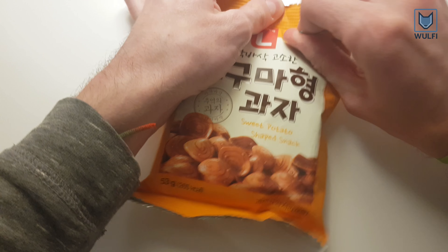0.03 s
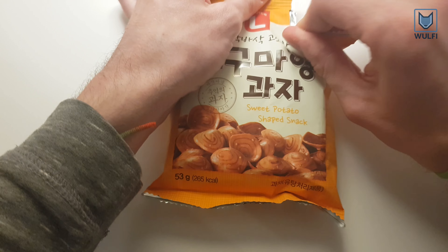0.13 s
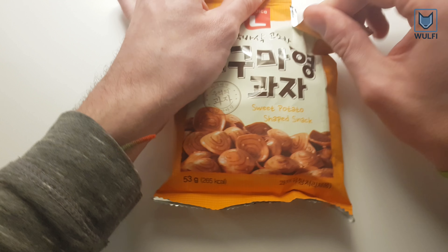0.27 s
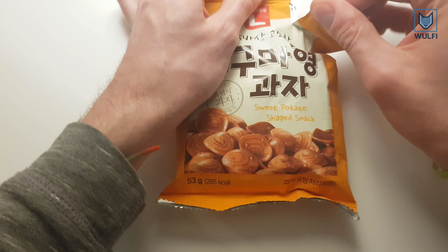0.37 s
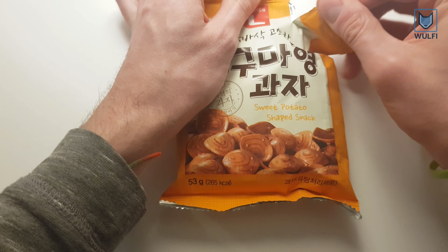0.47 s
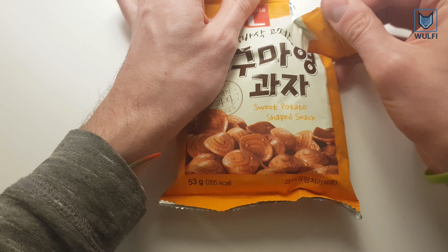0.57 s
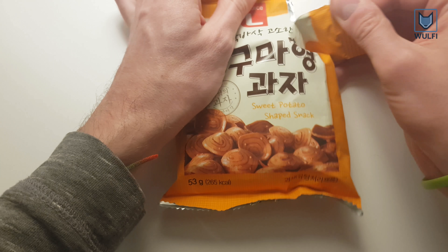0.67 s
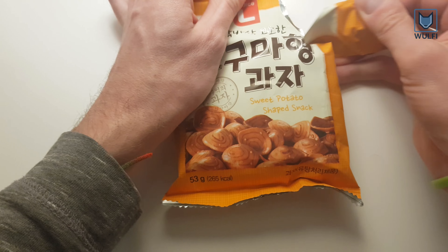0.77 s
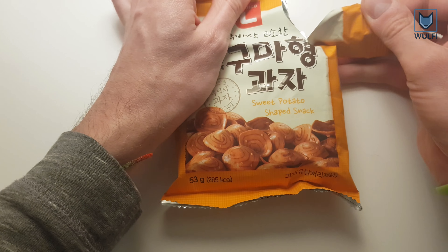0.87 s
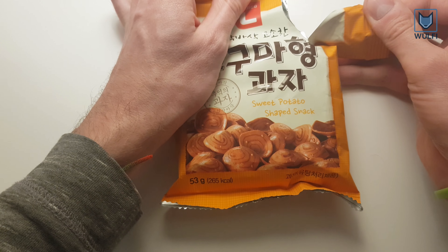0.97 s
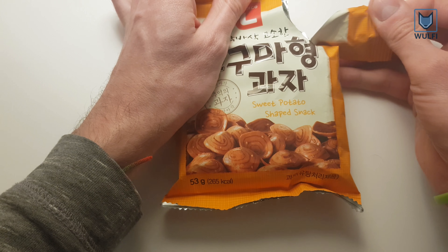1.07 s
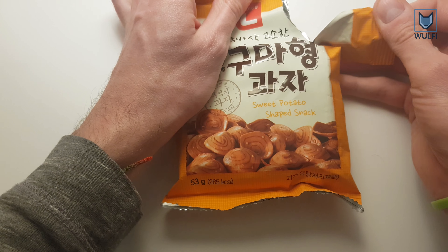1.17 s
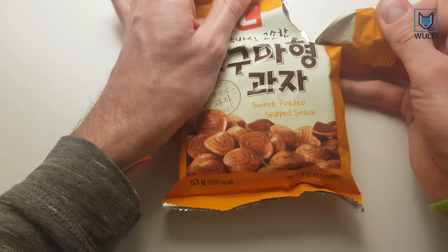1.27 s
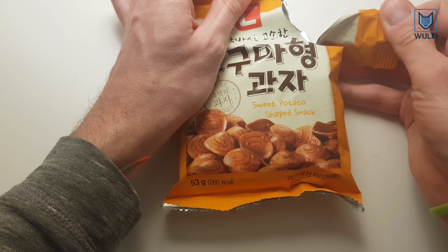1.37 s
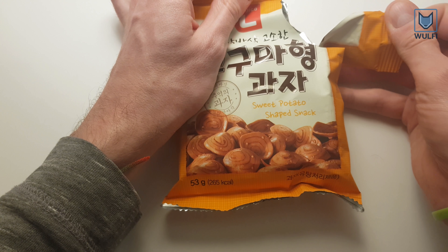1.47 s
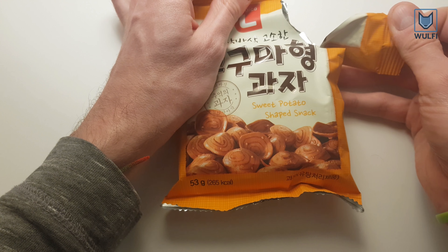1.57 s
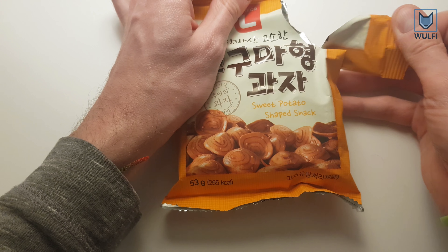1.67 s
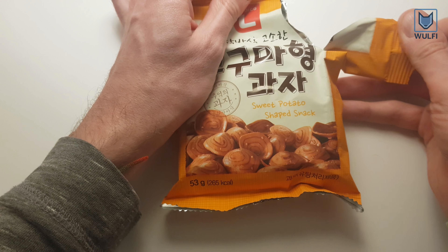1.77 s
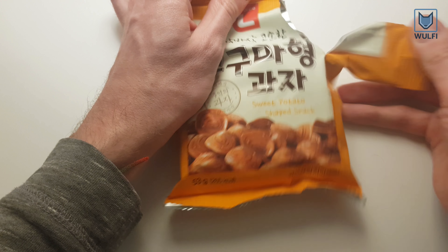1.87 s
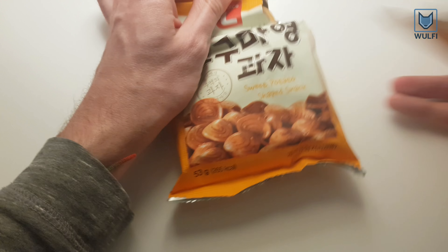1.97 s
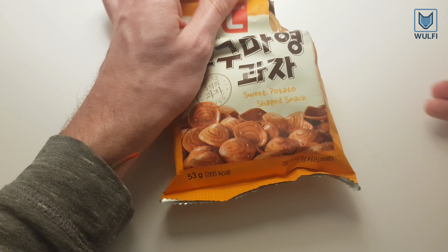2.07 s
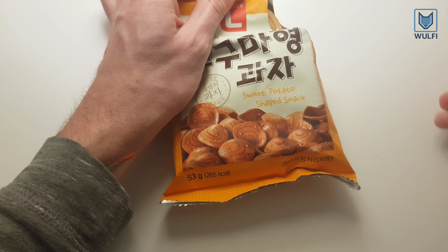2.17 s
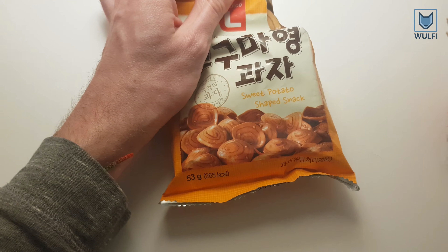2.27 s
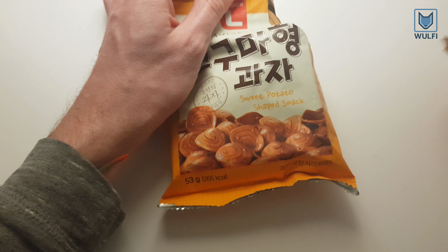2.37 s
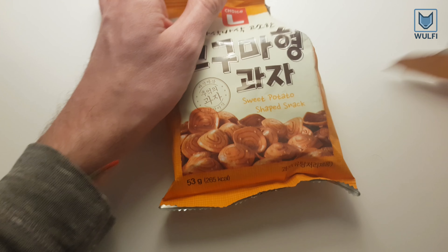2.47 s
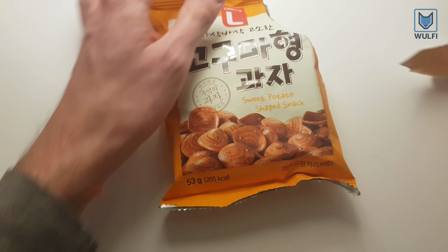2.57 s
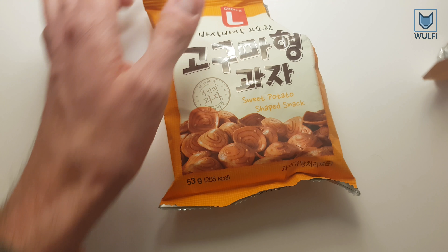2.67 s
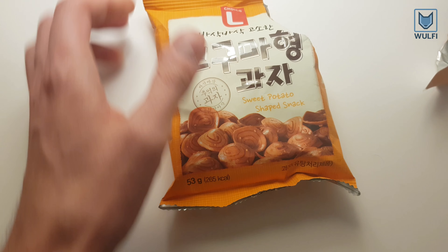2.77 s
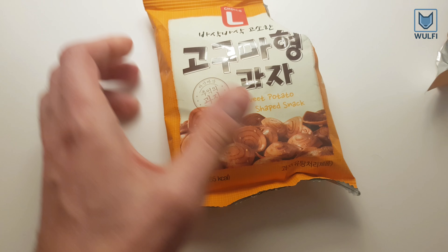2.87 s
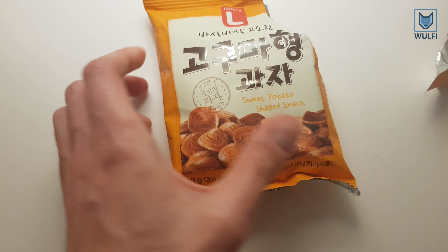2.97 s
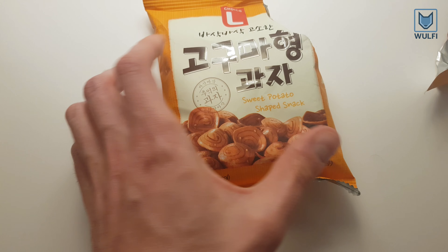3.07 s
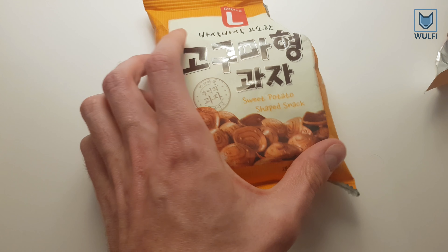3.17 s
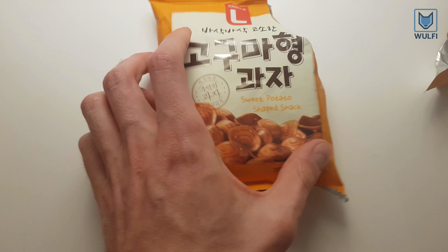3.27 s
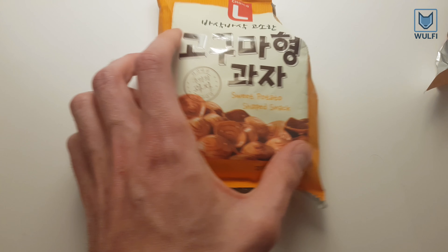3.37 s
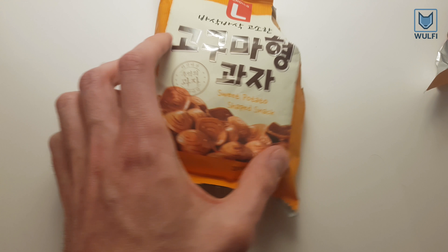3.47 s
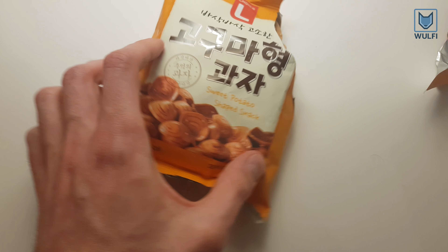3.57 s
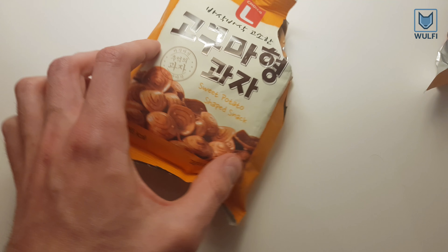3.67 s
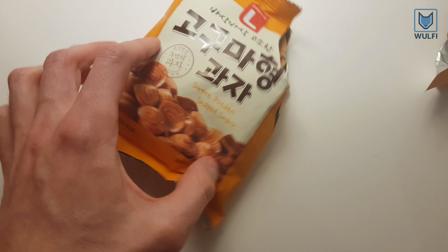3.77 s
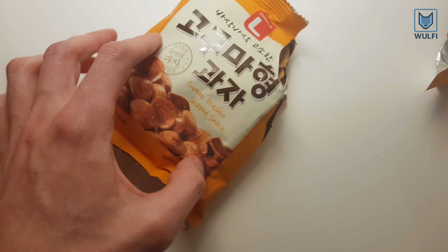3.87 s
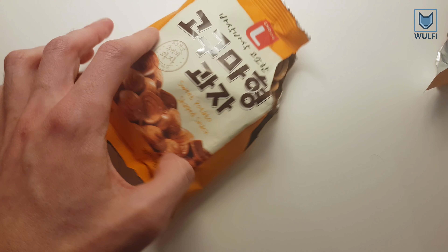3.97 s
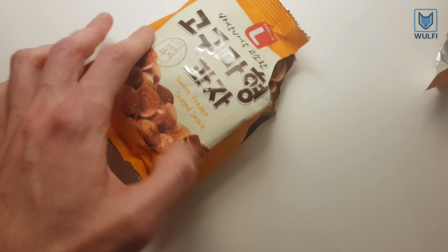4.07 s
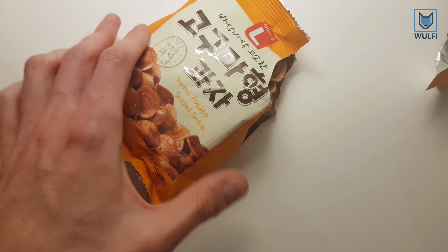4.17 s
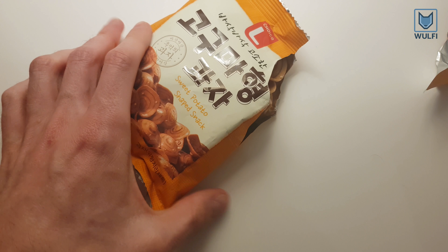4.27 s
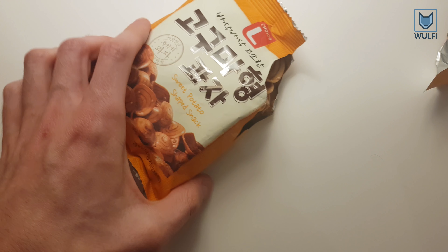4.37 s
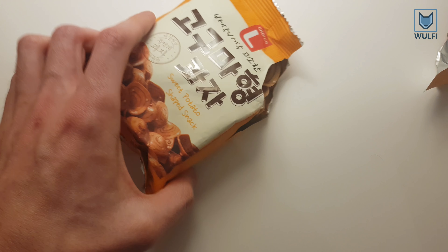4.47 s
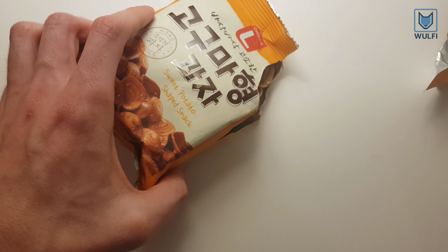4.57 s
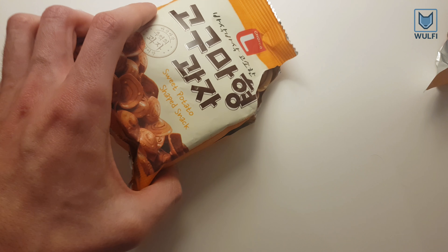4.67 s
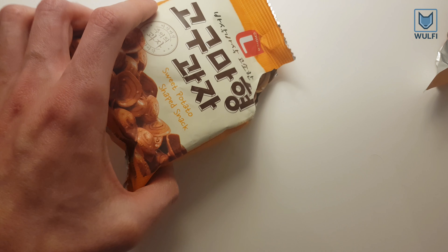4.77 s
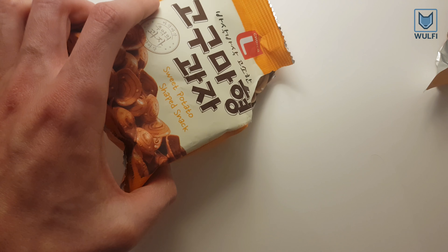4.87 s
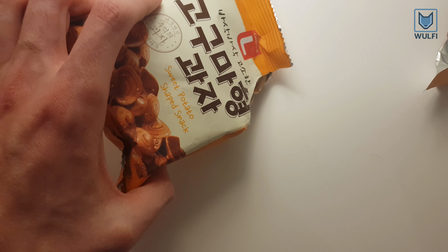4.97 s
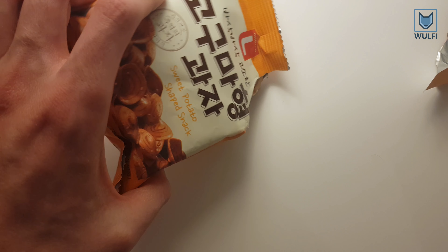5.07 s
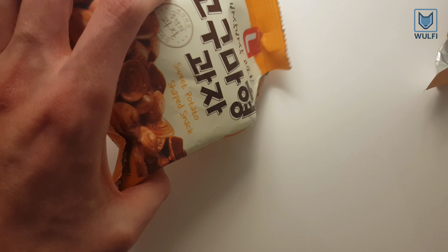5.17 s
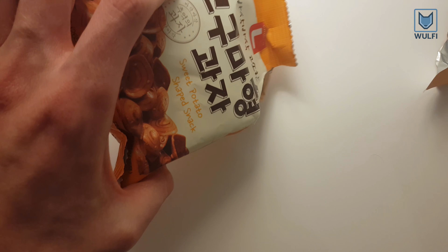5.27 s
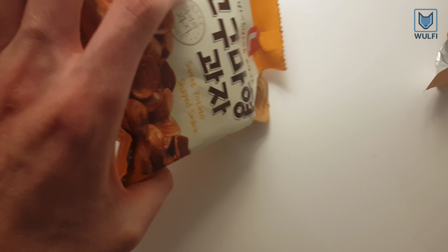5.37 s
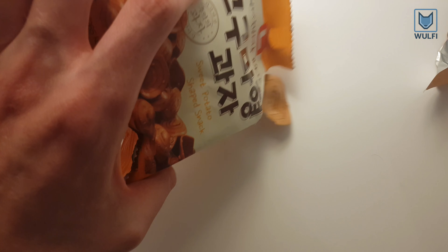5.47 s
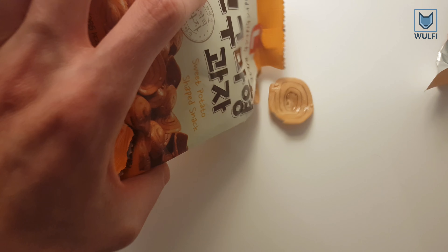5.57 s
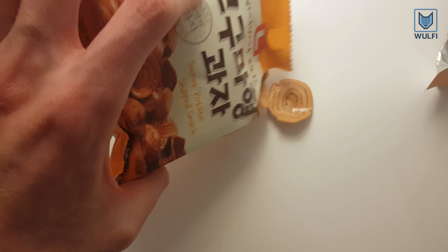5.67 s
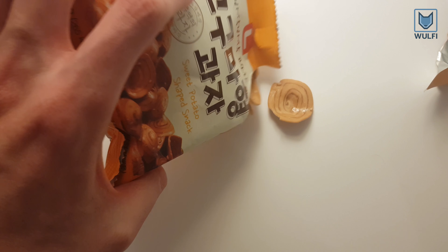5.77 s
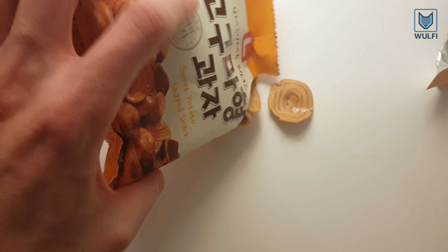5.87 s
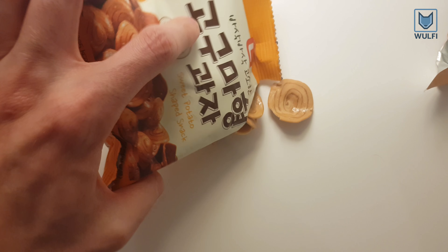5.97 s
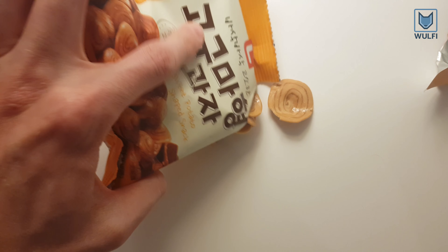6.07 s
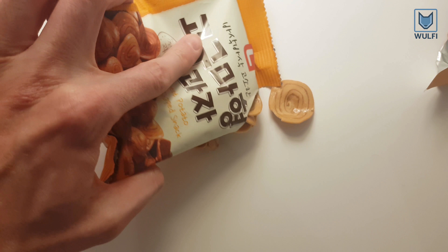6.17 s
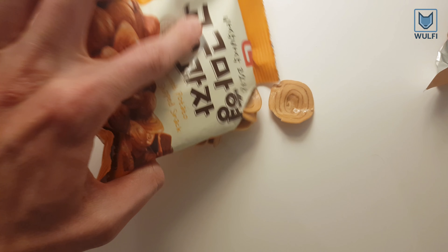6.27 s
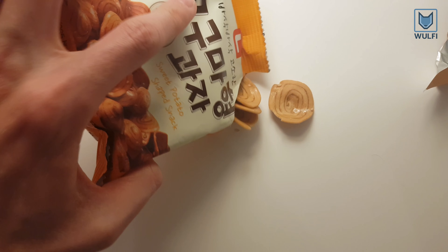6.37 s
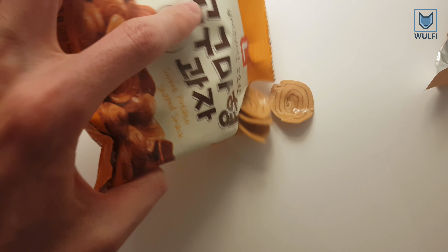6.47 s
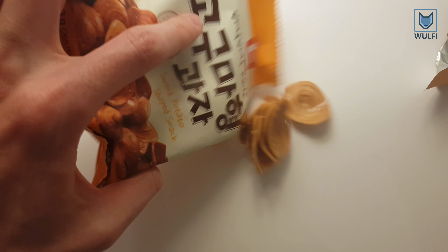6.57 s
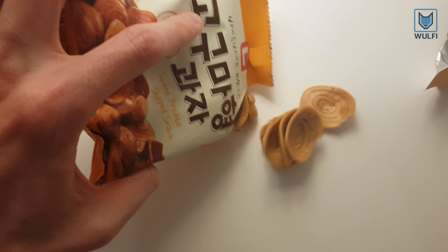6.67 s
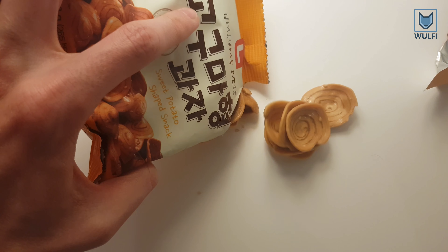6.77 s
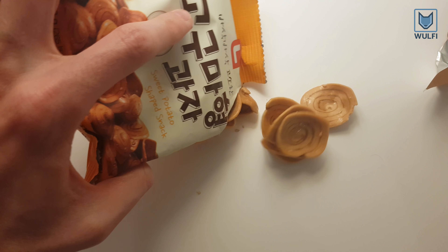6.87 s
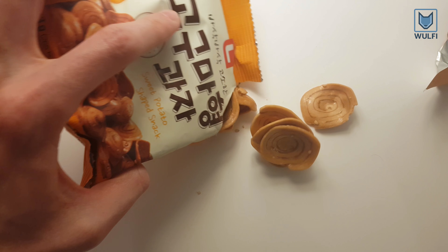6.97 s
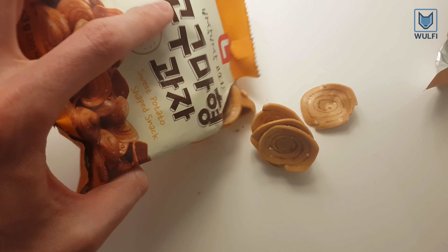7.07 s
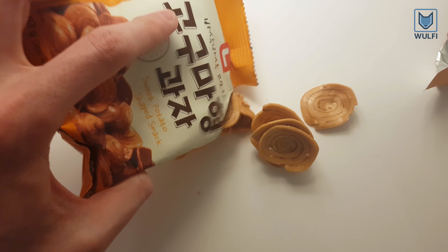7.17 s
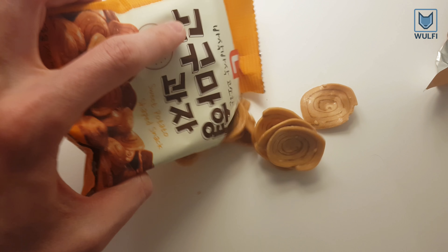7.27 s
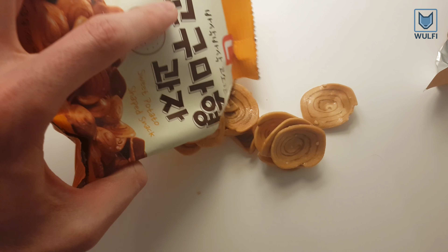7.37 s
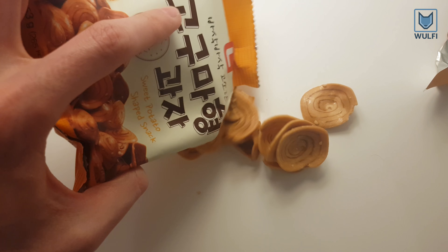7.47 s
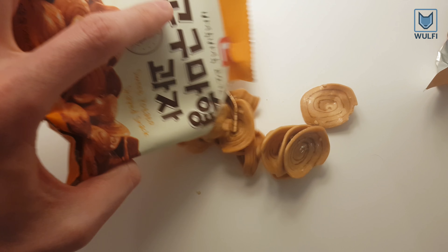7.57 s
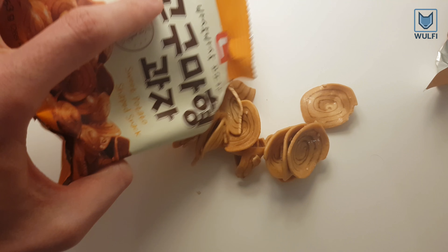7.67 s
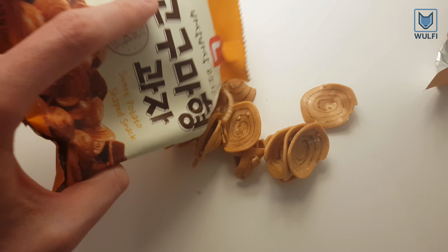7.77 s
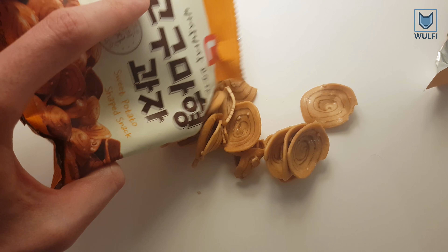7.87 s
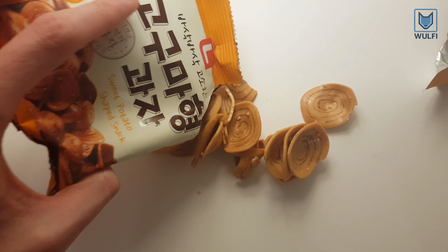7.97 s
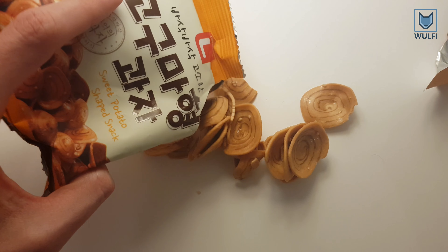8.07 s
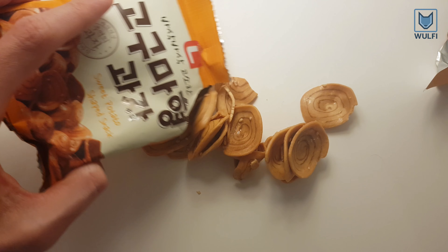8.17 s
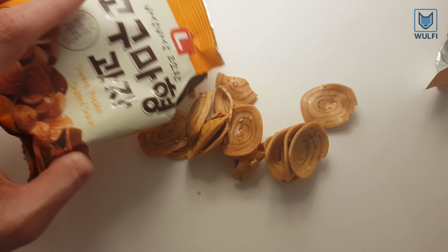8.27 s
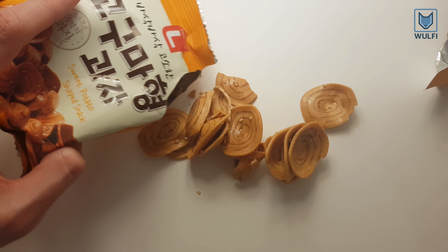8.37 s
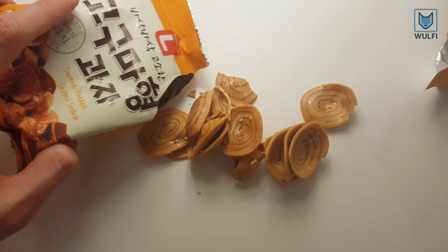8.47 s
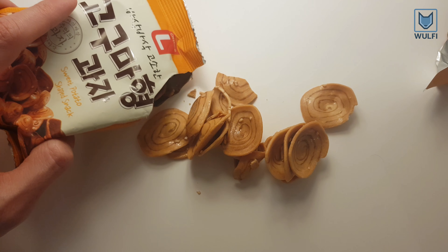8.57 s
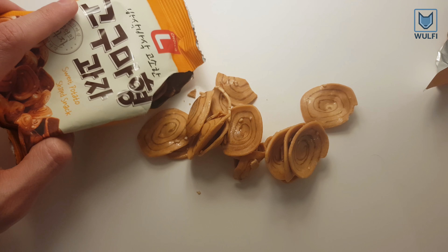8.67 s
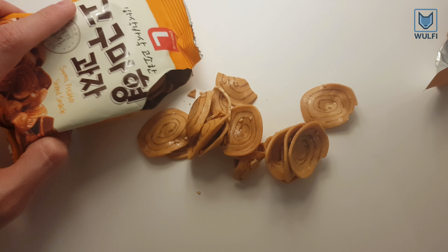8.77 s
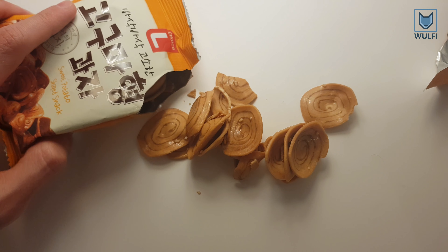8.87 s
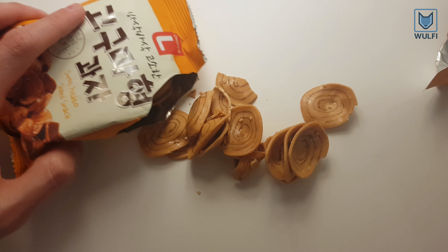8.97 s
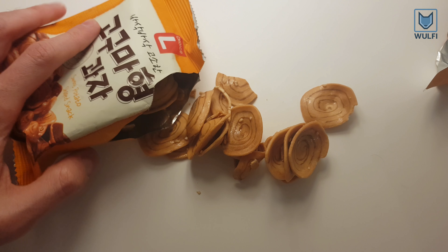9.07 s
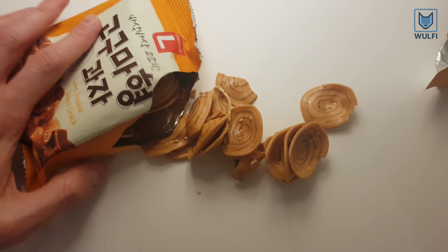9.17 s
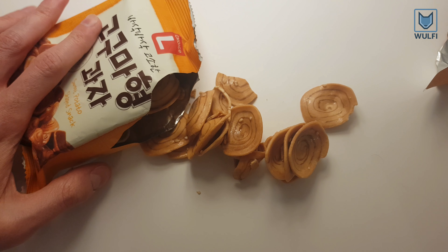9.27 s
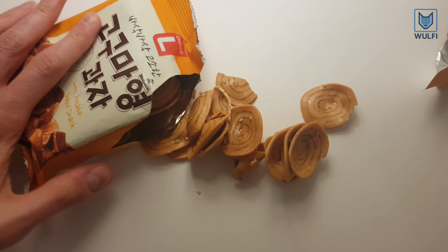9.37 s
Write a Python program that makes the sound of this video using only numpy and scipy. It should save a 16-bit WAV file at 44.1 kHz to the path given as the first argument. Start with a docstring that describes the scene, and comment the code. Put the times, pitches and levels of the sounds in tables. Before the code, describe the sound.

Very close stereo sound in a small bare room: a foil-lined bag crackles and snaps sharply as a corner is torn, with a loud burst at two seconds. After a near-quiet pause it rubs across the table, is gripped and tilted, then shaken so crisp snacks drop with dry woody knocks. Loud final crumples end it.

```python
"""Snack bag torn open and emptied on a table

In a small bare room, a stereo microphone close by hears a foil-lined bag torn at a corner, slid over a
table and shaken until crisp snacks tumble out. Creases snap as ringing noise bursts over a crackle of tiny
random ticks; hand work and sliding are shaped noise. Landing snacks excite decaying modes of the table top.
Decaying noise tails answer as the room, over a faint steady hush.
"""
import sys
import numpy as np
from scipy import signal
from scipy.fft import rfft, irfft, next_fast_len
from scipy.io import wavfile
from scipy.ndimage import uniform_filter1d, map_coordinates

SR = 44100
rng = np.random.default_rng(int(sys.argv[2]) if len(sys.argv) > 2 else 0)


def store_pcm(level_fs):
    """Save levels as 16-bit WAV."""
    pcm = np.round(np.clip(level_fs, -1, 1) * 32767).astype(np.int16)
    wavfile.write(sys.argv[1], SR, np.atleast_2d(pcm).T)


N = 415863  # samples, about 9.4 s


def amp(db):
    """Decibels to an amplitude factor."""
    return 10 ** (np.asarray(db) / 20)


def unit(x):
    """Each row at rms 1."""
    return x / np.sqrt(np.mean(x ** 2, axis=-1, keepdims=True) + 1e-20)


def along(points, hz):
    """Interpolate (Hz, value) points on a log frequency axis."""
    f, v = np.transpose(points)
    return np.interp(np.log(hz + 1), np.log(f + 1), v)


def filtered(x, response):
    """Multiply the spectrum of x by a response of frequency."""
    size = next_fast_len(N + SR // 4)
    spectrum = rfft(x, size) * response(np.fft.rfftfreq(size, 1 / SR))
    return irfft(spectrum, size)[..., :N]


def coloured(x, spectrum):
    """Filter x by a table of gains, then set it to rms 1."""
    return unit(filtered(x, lambda hz: amp(along(spectrum, hz))))


def band(x, lo_hz, hi_hz, order=2):
    """A causal band-pass."""
    edges = [lo_hz, min(hi_hz, SR / 2 - 1)]
    return signal.sosfilt(signal.butter(order, edges, 'band', fs=SR, output='sos'), x)


def pair(shape, apart):
    """Noise at the two microphone ports: a shared part plus a part of their own."""
    return rng.standard_normal(shape) + apart * rng.standard_normal((2, *shape))


def add(track, s, sound):
    """Lay a sound into the track at time s."""
    start = max(round(s * SR), 0)
    part = track[:, start:start + sound.shape[-1]]
    part += sound[:, :part.shape[-1]]


def ticks(per_second, spread_db, apart):
    """Random impulses under noise of either sign: many small, a few large."""
    size = amp(spread_db * np.minimum(rng.exponential(size=N), 3))
    return (rng.random(N) < per_second / SR) * size * pair((N,), apart)


def patchy(x, depth_db, width_bins, length_frames):
    """The film bends, so its resonances come and go: a smoothed random gain over time and frequency."""
    z = signal.stft(x, nperseg=512)[2]
    field = rng.standard_normal(z.shape[1:])
    field = uniform_filter1d(field, width_bins, 0)
    field = uniform_filter1d(field, length_frames, 1)
    z = z * amp(depth_db * field / field.std())
    return signal.istft(z, nperseg=512)[1][:, :N]


# Colour of the quiet room at the microphone. Each row: frequency in Hz, gain in dB.
HUSH_COLOUR = [(15, -51.5), (25, -18), (43, -4.5), (97, 4.5), (363, -17), (1840, -27.5), (2410, -19),
               (5000, -26), (6920, -36), (12500, -22.5), (14800, -21.5), (16000, -30.5)]


def room_hush(level_db=-66.5):
    """The quiet room: steady coloured noise, partly shared by the two ports."""
    return amp(level_db) * coloured(pair((N,), 1.0), HUSH_COLOUR)


SWELL_DB = 20  # gained over each rise time and lost over each fall time


def swell(t, start, end, rise, fall):
    """A gain that rises to 1 at start, holds until end and dies away, in straight lines of dB."""
    before = np.maximum(start - t, 0) / rise
    after = np.maximum(t - end, 0) / fall
    return amp(-SWELL_DB * (before + after))


HOLD_ATTACK_S, HOLD_RELEASE_S = 0.022, 0.082
HELD_SNACKS_DB = -3.5  # snacks stirring in a lightly held bag, against the film
# Light handling of the bag between swells. Each row: start in seconds, end in seconds,
# film level in dB before the layer trims.
HOLDS = [(0, 0.937, -50.5), (0.953, 1.9, -68.5), (1.895, 2.744, -58), (3.84, 4.945, -57.5),
         (4.95, 5.299, -65), (5.39, 6.92, -57), (6.912, 8.376, -54.5), (8.407, 8.8, -61.5),
         (8.798, 9.43, -55)]
# Swells of crackle and stirring as the bag is worked; the faint ones near 1.24 and 1.47 s are bright tails
# of snaps. Each row: peak in seconds, rise in seconds, fall in seconds,
# film level in dB, snack level in dB (both before the layer trims).
SWELLS = [(.01, 0.042, 0.081, -43, -48), (.16, .012, 0.056, -24, -41), (.195, .04, 0.053, -25.5, -40),
          (.36, .03, 0.056, -43.5, -58), (.555, .03, 0.099, -48.5, -63), (.75, 0.042, 0.25, -40, -61),
          (.905, 0.086, 0.025, -32, -60), (1.24, .06, .12, -67.5, -69), (1.47, .03, .2, -57, -56),
          (1.77, 0.037, .13, -45.5, -42), (1.985, 0.029, 0.089, -19, -32), (2.069, .05, 0.028, -21, -30),
          (2.43, 0.0255, 0.15, -42, -63), (2.548, 0.099, 0.1, -33.5, -35), (3.863, 0.03, 0.18, -38, -42),
          (4.026, 0.023, 0.14, -42, -44), (4.15, 0.091, 0.14, -40, -41), (4.39, 0.026, 0.29, -46.5, -53),
          (4.58, .065, 0.054, -27.5, -38), (5.15, 0.047, 0.27, -44, -49), (5.45, 0.106, 0.095, -40.5, -45),
          (5.525, 0.044, 0.14, -38, -50), (5.68, 0.14, 0.2, -37, -43), (5.839, .04, 0.04, -44, -44),
          (5.986, .02, 0.11, -37.5, -46), (6.11, .1, .1, -40, -42), (6.215, 0.032, 0.22, -35.5, -39),
          (6.41, 0.076, 0.21, -31.5, -36), (6.616, 0.054, .07, -28, -44), (6.719, 0.12, 0.16, -27, -35),
          (7.09, .08, 0.2003, -47, -50), (7.274, 0.02, 0.25, -35.5, -39),
          (7.389, 0.063, 0.14, -28.5, -34.5), (7.74, 0.42, 0.32, -36, -38.5), (8.1, 0.26, 0.28, -41, -41.5),
          (8.35, 0.16, 0.044, -40.5, -50), (8.455, .04, 0.061, -46, -51), (8.949, 0.12, .13, -45, -41),
          (9.18, 0.083, 0.067, -28, -30), (9.283, .015, 0.096, -27, -38)]


def handling():
    """How strongly the film crackles and the snacks stir: powers add up into two gains per sample."""
    t = np.arange(0, N / SR, .001)
    film = 0
    for start, end, db in HOLDS:
        film = film + (amp(db) * swell(t, start, end, HOLD_ATTACK_S, HOLD_RELEASE_S)) ** 2
    stir = film * amp(HELD_SNACKS_DB) ** 2
    for s, rise, fall, film_db, snacks_db in SWELLS:
        power = swell(t, s, s, rise, fall) ** 2
        film = film + amp(film_db) ** 2 * power
        stir = stir + amp(snacks_db) ** 2 * power
    return [np.interp(np.arange(N) / SR, t, np.sqrt(power)) for power in (film, stir)]


# Snacks running out of the bag onto the table. Each row: time in seconds, flow from 0 to 1.
POUR = [(5.2, 0.39), (5.5, 1), (8.3, 1), (8.5, 0.1)]


def pouring():
    """The flow of snacks out of the bag at every sample; the first and last values hold outside the table."""
    return np.interp(np.arange(N) / SR, *np.transpose(POUR))


FIZZ_DB, FIZZ_GROWS = -12.5, 0.95  # fizz in dB before its trim = FIZZ_DB + FIZZ_GROWS x film level in dB
# Colour of the crackling film, close up. Each row: frequency in Hz, gain in dB.
FILM_COLOUR = [(400, -5), (620, -2), (820, 10.5), (1100, 0), (1450, 6), (2300, 5.5), (3400, 4), (5000, 8),
               (7600, -1), (9500, 1), (12500, -4.5), (15500, -9.5)]


def crackle(film, crackle_db=0.5, fizz_db=9.0, split_hz=5000, wrinkle_t60=0.023):
    """Countless tiny wrinkles give way while the film is worked; sliding snacks add a finer grain."""
    fizz = amp(FIZZ_DB) * film ** FIZZ_GROWS
    fine = .5 * pouring()
    coarse_energy = unit(ticks(750, 3.8, .3)) ** 2
    fine_energy = unit(ticks(2500, 3., .5)) ** 2
    energy = (1 - fine) * coarse_energy + fine * fine_energy
    # every wrinkle is a burst of a few milliseconds
    t = np.arange(SR // 100) / SR
    flutter = amp(-60 * t / wrinkle_t60)
    power = signal.fftconvolve(energy, flutter[None] ** 2, axes=1)[:, :N]
    grains = np.sqrt(np.abs(power)) * pair((N,), 1.7)
    grains = coloured(patchy(grains, 1.8, 7, 2), FILM_COLOUR)
    low = unit(band(band(grains, 650, 13000), 200, split_hz, order=1))
    high = unit(band(band(grains, split_hz, 18000, order=1), 2600, 23000))
    return amp(crackle_db) * film * low + amp(fizz_db) * fizz * high


def crisp_ticks(film, tick_db=-5.5, per_second=260, spread_db=3.5, low_hz=1000, high_hz=7000, cycles=0.7, count=2600):
    """Snacks and stiff wrinkles touch: dry clicks, each a brief decaying sine of its own pitch."""
    chance, t = rng.random((count, 2)), np.arange(SR // 150) / SR
    times = (np.arange(count) + 3 * chance[:, 0]) / per_second
    hz = (low_hz * (high_hz / low_hz) ** chance[:, 1])[:, None]
    size = amp(spread_db * np.minimum(rng.exponential(size=(count, 1)), 3))
    # the higher the click, the more its phase differs between the ports
    phase = 2 * np.pi * hz * t + hz / 3500 * rng.standard_normal((2, count, 1))
    clicks = size * unit(np.sin(phase) * np.exp(-hz * t / cycles))
    out = np.zeros((2, N))
    for k, s in enumerate(times):
        add(out, s, clicks[:, k])
    return amp(tick_db) * film * unit(band(out, 490, 14000))


# Colour of snacks heard through the pouch. Each row: frequency in Hz, gain in dB.
POUCH_COLOUR = [(40, -37.5), (70, -18.5), (110, -9), (160, 3.5), (240, 3), (330, -11.5), (420, 0.5),
                (490, 3), (600, -11), (820, -6.5), (1100, -27), (2000, -50)]


def jostle(stir):
    """Snacks jostle in the pouch: random ticks coloured by the pouch, following the stirring."""
    return stir * coloured(ticks(260, 5.3, 0.36), POUCH_COLOUR)


SMALL_PER_S, SMALL_SPREAD_DB, SMALL_PAN_DB = 32, 5, 5.5
SMALL_RING_DB, SMALL_CRACK_DB, SMALL_THUD_DB = 4.5, -5.5, 4  # over the film level, before the snap trims
SMALL_LOW_HZ, SMALL_HIGH_HZ = 780, 3600
SMALL_FOLLOWS = 0.29  # share of a swell's extra dB that small creases gain


def small_snaps(film, count=305):
    """Small creases flip by chance in each hold, stronger in a swell: rows like those of SNAPS."""
    chance, scatter = rng.random((count, 2)), rng.standard_normal((count, 4))
    s = (np.arange(count) + chance[:, 0]) / SMALL_PER_S
    pitch = SMALL_LOW_HZ * (SMALL_HIGH_HZ / SMALL_LOW_HZ) ** chance[:, 1]
    film_db = 20 * np.log10(film[np.minimum(s * SR, N - 1).astype(int)])
    offsets = SMALL_SPREAD_DB * scatter[:, :3] + [SMALL_RING_DB, SMALL_CRACK_DB, SMALL_THUD_DB]
    ring, crack, thud = offsets.T
    pan = SMALL_PAN_DB * scatter[:, 3]
    rows = []
    for start, end, hold_db in HOLDS:
        for k in np.flatnonzero((s >= start) & (s < end)):
            db = hold_db + SMALL_FOLLOWS * (film_db[k] - hold_db)
            rows.append((s[k], db + ring[k], pitch[k], db + crack[k], db + thud[k], pan[k]))
    return rows


# Where the bag lies before the microphone. Each row: time in seconds,
# lead in ms by which its sound reaches the left port first.
LEFT_LEAD = [(0, 0), (2, 0.00078), (4, 0.097), (8.2, 0.11), (8.6, 0.24), (9.4, 0.21)]
# Single creases buckling, loud and faint. Each row: start in seconds, ring level in dB, facet pitch in Hz,
# crack level in dB, thud level in dB (levels before the trims), left over right in dB.
SNAPS = [(.0186, -33, 1520, -62.5, -48, 4.5), (.0632, -20, 2730, -28.5, -36, -1),
         (.0712, -32, 2300, -48, -52, 0), (.0897, -36.5, 2970, -45, -54, -1.5),
         (.0978, -19, 2820, -20, -37, -1), (.1082, -32.5, 959, -42.5, -42, -1.5),
         (.1141, -17, 2620, -25, -41, 0.5), (.1544, -19.5, 3370, -19, -29, 0),
         (.1605, -21, 1488, -35.5, -38, -2.5), (.1692, -17.5, 3470, -24.5, -25.5, 3),
         (.1868, -24.5, 3400, -21.5, -40, -0.5), (.1954, -29, 5100, -21.5, -42, -2.5),
         (.2089, -27, 3430, -33.5, -32, 0.5), (.2152, -27.5, 2130, -24, -38, 1),
         (.2215, -29, 2700, -36, -46, 1.5), (.2409, -27, 7600, -25, -55, -5),
         (.2555, -33.5, 1600, -52.5, -54, -0.5), (.2652, -30, 3600, -41.5, -57, 15),
         (.2866, -27.5, 3650, -45, -33.5, -0.5), (.3372, -29, 1970, -47, -47, 3),
         (.346, -31, 3500, -30.5, -50, -2), (.3658, -24.5, 1300, -29.5, -48, 1.5),
         (.3879, -38.5, 1460, -46, -57, 1), (.4598, -33.5, 930, -58, -38, 0),
         (.4871, -26.5, 1880, -33.5, -62, 3), (.4959, -36, 4460, -30, -59, -4.5),
         (.5415, -18, 3580, -20.5, -30.5, -0.5), (.567, -28, 990, -33, -48, -2),
         (.6063, -29, 2880, -29.5, -53, 1), (.6396, -29.5, 1400, -45, -35, 1),
         (.6516, -33, 1340, -41, -32, 0.5), (.671, -38.5, 1380, -55, -42, 1),
         (.6975, -28, 1760, -40.5, -31, -0.5), (.717, -25, 3300, -24, -43, -1.5),
         (.7265, -11, 1490, -22.5, -45, 2), (.7365, -33, 1388, -34, -42, -0.5),
         (.7684, -38.5, 3230, -28.5, -47, -5), (.7826, -24, 1340, -28, -29.5, -1),
         (.81, -30, 860, -34.5, -38, 1.5), (.8362, -27.5, 1340, -42, -30.5, -0.5),
         (.8443, -34.5, 3360, -50, -43, 1.5), (.8507, -32, 3470, -30, -46, -4),
         (.8589, -31, 3500, -38, -32, 1.5), (.885, -23.5, 4700, -25.5, -44, 3.5),
         (.8893, -27, 4170, -18, -55, 2), (.8975, -24, 4630, -18, -45, -4.5),
         (.9175, -30.5, 5530, -23, -55, 2.5), (.9762, -40, 2208, -43.5, -69, 0.5),
         (.9873, -33.5, 3300, -30, -41, 0.5), (1.026, -32, 1590, -42, -41.5, 0.5),
         (1.094, -33, 3700, -48, -69, -1.5), (1.1386, -46, 865, -70, -46, -1),
         (1.1756, -38, 2809, -41, -67, 3.5), (1.1888, -24.5, 3800, -33.5, -60, -0.5),
         (1.2254, -26, 4760, -26.5, -60, 2), (1.239, -37, 2970, -43, -69, -1),
         (1.2597, -21, 1770, -23.5, -47, 0), (1.2944, -35, 1450, -31, -39.5, -0.5),
         (1.4129, -39, 1599, -59.5, -72, 1), (1.4408, -30.5, 1890, -48, -53, -1),
         (1.4469, -22.5, 1890, -20, -44, -0.5), (1.4593, -22, 3150, -20, -58, -1),
         (1.5027, -33, 894, -41.5, -52, -0.5), (1.5112, -31.5, 885, -41, -45, 2),
         (1.5491, -32.5, 1980, -40.5, -50, 1.5), (1.5717, -42.5, 3570, -44, -55, 0.5),
         (1.5856, -31.5, 4453, -37.5, -42, -1), (1.6019, -31, 3600, -40.5, -35, -0.5),
         (1.6694, -31, 979, -62, -34, -3), (1.682, -22.5, 5560, -22.5, -49, 1),
         (1.7065, -34.5, 1380, -41.5, -51, 0.5), (1.716, -24.5, 3740, -30.5, -33, -0.5),
         (1.7581, -20.5, 3020, -21.5, -33, 3), (1.7684, -23.5, 1150, -22.5, -26.5, -1.5),
         (1.8255, -24, 2740, -30, -29, 0.5), (1.8439, -37.5, 1620, -50, -45, 0.5),
         (1.9123, -36.5, 1420, -38.5, -43, 1), (1.9492, -20, 2040, -30.5, -27, 1),
         (1.9719, -16.5, 3427, -18.5, -24, 0.5), (1.9878, -21, 1930, -18, -26, -2.5),
         (2.0004, -31.5, 3810, -24.5, -27, -4), (2.018, -17.5, 920, -23, -19.5, -1),
         (2.0449, -20.5, 3400, -26, -42, 7.5), (2.0562, -15, 1900, -18, -22.5, -1.5),
         (2.0622, -21, 1650, -24.5, -32, 1), (2.0777, -15.5, 4220, -16.5, -32, -2.5),
         (2.0877, -26, 1420, -33, -21.5, 4), (2.1946, -32, 3893, -46, -43, -2),
         (2.2014, -37.5, 2020, -40.5, -44, 1.5), (2.3092, -36.5, 1730, -53.5, -37.5, 0.5),
         (2.3488, -40.5, 1410, -67, -51, -1), (2.3846, -36.5, 1440, -43.5, -68, -0.5),
         (2.4026, -31.5, 3040, -47, -38, -2), (2.4189, -26.5, 3010, -33, -64, 2),
         (2.4327, -27.5, 1980, -23, -64, -0.5), (2.4591, -34, 3530, -41.5, -55, 1),
         (2.4949, -25, 3470, -38, -59, 1.5), (2.504, -29, 1360, -30.5, -35.5, 1.5),
         (2.5274, -23, 3460, -24, -31, 1), (2.5334, -24.5, 940, -29, -28.5, -0.5),
         (2.5868, -22.5, 1360, -26.5, -31.5, 2.5), (2.6041, -31.5, 900, -46, -55, -4.5),
         (3.3915, -37, 2145, -71, -44, -3), (3.5697, -34, 1650, -59, -71, 0),
         (3.858, -23.5, 3550, -27.5, -57, 2.5), (3.876, -26.5, 1050, -44.5, -37, 2.5),
         (3.887, -31, 900, -39, -35, 3.5), (3.9112, -20.5, 2107, -31.5, -44, 0.5),
         (3.947, -31, 1830, -58, -58, 1), (3.9615, -29, 915, -54.5, -38, 0),
         (4.0149, -25.5, 3400, -34.5, -30.5, 2), (4.1342, -26, 1960, -46, -26.5, 0.5),
         (4.138, -25, 1923, -34.5, -29, -2), (4.1602, -20, 2280, -26, -25, 3.5),
         (4.1936, -25.5, 1180, -41.5, -37, 3), (4.3813, -27.5, 1950, -63, -26.5, -1),
         (4.4242, -29.5, 2103, -39, -36.5, 3), (4.467, -25, 1006, -47, -31, -1),
         (4.5072, -29, 1880, -30, -53, 1.5), (4.5322, -17.5, 850, -41, -31, -0.5),
         (4.5518, -25.5, 4100, -29, -60, -1.5), (4.5662, -20.5, 3580, -18, -28.5, 5),
         (4.5859, -17.5, 2330, -22.5, -51, 3), (4.6021, -17.5, 3670, -20.5, -31, 3),
         (4.621, -24, 4600, -25.5, -56, -3), (4.6416, -26, 1050, -36, -31.5, -1),
         (4.7237, -24.5, 4490, -38, -40, 1), (4.7745, -25.5, 3720, -31.5, -34.5, 0),
         (4.7846, -33, 1030, -56, -53, 7), (4.8143, -37, 960, -61, -35.5, -1),
         (4.845, -28.5, 4740, -43, -39, 2), (4.9271, -38.5, 805, -63, -40, 1),
         (5.1365, -26.5, 3940, -29, -28.5, -6), (5.1436, -22.5, 2960, -21.5, -51, 5.5),
         (5.1784, -29.5, 1010, -44, -33, 5), (5.3987, -37, 817, -54, -40, 2),
         (5.435, -29, 2620, -56, -34, -1), (5.4451, -26, 3320, -58, -30, 0.5),
         (5.4637, -32, 4560, -41.5, -43, 1), (5.5389, -31.5, 4456, -49.5, -36, -6),
         (5.5575, -34, 850, -52, -38, 2), (5.6549, -30, 856, -38.5, -34, 2.5),
         (5.6941, -50, 755, -27.5, -45, 6), (5.712, -33, 1910, -55, -48, 0),
         (5.7488, -51, 850, -44, -46, -1), (5.7663, -34.5, 816, -41, -45, 0),
         (5.8231, -46, 2560, -36.5, -49, -2), (5.8359, -31.5, 802, -33, -32, 0),
         (5.9845, -40, 846, -31.5, -24.5, 3), (5.9938, -49, 899, -31, -44, 4.5),
         (6.002, -35, 2400, -48, -44, 0), (6.0811, -37.5, 824, -52, -36, 4),
         (6.1191, -45, 3660, -39.5, -37, -4), (6.136, -30, 3030, -47, -38, 0),
         (6.1414, -24.5, 3020, -47, -33, 0.5), (6.1834, -36, 900, -56, -45, 2),
         (6.2003, -36, 3900, -31, -45, 3.5), (6.208, -21, 843, -23, -27, 1),
         (6.2603, -30, 1490, -41, -31, 2), (6.2817, -27, 1770, -36, -30.5, 2),
         (6.3487, -34.5, 2460, -30.5, -32, 1), (6.3564, -34, 1960, -37, -44, 0.5),
         (6.3752, -24, 3600, -28, -47, 0.5), (6.395, -23, 846, -49.5, -31, 0),
         (6.4215, -21.5, 3114, -26, -29.5, 7.5), (6.4276, -27, 2630, -16, -40, -3),
         (6.4533, -19.5, 4200, -28.5, -25, -1), (6.48, -30.5, 820, -34.5, -29.5, 6),
         (6.5986, -34.5, 945, -42.5, -38, 1.5), (6.616, -23, 1780, -23.5, -25, 0.5),
         (6.6369, -33, 1500, -45, -36, 4.5), (6.662, -30, 2135, -41, -22, 4),
         (6.6724, -18, 3950, -14, -38, -0.5), (6.7084, -23, 1540, -22.5, -30, 1),
         (6.7778, -17, 2460, -29.5, -28, -2.5), (6.8256, -31, 860, -34, -22.5, 0.5),
         (6.8368, -28, 759, -38, -35, 2), (6.9009, -30.5, 5324, -38, -55, -1),
         (7.184, -31.5, 845, -43, -42, 2), (7.2694, -24, 3730, -34.5, -30.5, 1),
         (7.282, -33, 1310, -40, -38, 0), (7.2932, -31, 2870, -36.5, -33, 2.5),
         (7.3097, -44, 1530, -30.5, -52, 0), (7.3719, -36, 740, -26.5, -25.5, 1),
         (7.383, -37.5, 796, -31, -31, 5), (7.4366, -22.5, 2167, -26.5, -29, 4.5),
         (7.5169, -37.5, 3500, -33, -54, 2), (7.6166, -37, 840, -44, -41, 1.5),
         (7.6943, -29, 5270, -39, -32, 1), (7.7025, -17.5, 840, -28.5, -48, 6),
         (7.8698, -29, 4800, -33.5, -46, 0), (7.9939, -40, 4570, -36.5, -42, -3),
         (8.0075, -30.5, 1340, -37.5, -33, 0), (8.0147, -34, 1290, -46, -41, -2),
         (8.0386, -35, 1380, -44, -50, 4), (8.107, -26.5, 860, -21, -30, 1.5),
         (8.1539, -32, 990, -30.5, -34.5, -3.5), (8.1841, -33, 810, -36, -59, 1.5),
         (8.2018, -38, 860, -41, -48, -1), (8.2192, -34.5, 1120, -44.5, -35, 0),
         (8.2652, -38, 1120, -36, -42, 2), (8.3347, -35, 4460, -41.5, -31.5, -1),
         (8.4314, -39, 2280, -47, -42, 4.5), (8.457, -48, 3070, -42.5, -52, 6.5),
         (8.5704, -38.5, 910, -75, -39, 4), (8.6794, -37.5, 940, -74, -38, 5.5),
         (8.8038, -43, 3250, -35.5, -70, 3.5), (8.8327, -36.5, 3430, -42, -67, 6),
         (8.8678, -34, 3440, -63, -33, 6.5), (8.9073, -38, 3490, -66, -36, 6),
         (8.9315, -38, 1100, -62, -41, 1), (8.9679, -28.5, 473, -54, -26, 2),
         (9.035, -38, 3300, -47.5, -38, 2), (9.0086, -19.5, 3530, -22.5, -31, 2),
         (9.1357, -15.5, 838, -36, -30.5, 1.5), (9.1531, -24, 2670, -30, -21, -1),
         (9.1826, -18.5, 2062, -20.5, -21, 3.5), (9.186, -14, 1485, -16, -29, 2),
         (9.2275, -34.5, 800, -52, -30, -0.5), (9.2688, -24.5, 900, -51, -22, 1),
         (9.2772, -11, 1950, -19.5, -14.5, 1), (9.2874, -13, 2170, -13.5, -31, 2),
         (9.2998, -20, 3450, -38.5, -55, 0.5)]


def snaps(rows, attack_s=0.00045, ring_t60=0.017, crack_t60=0.015, click_t60=0.0023, click_db=10.5,
          thud_t60=0.026, after_t60=0.069, after_db=-20.0, shape=1.22, facet_q=13.0, facet_db=1.0,
          overtone_db=-4.0, crack_trim_db=0.6):
    """A crease flips: the film cracks, the freed facet rings for a few cycles, the pouch gives a soft thud."""
    s, ring, pitch, crack, thud, pan = np.transpose(rows)[..., None]
    size = 1280  # samples of each snap
    t, hz = np.arange(size) / SR, np.fft.rfftfreq(size, 1 / SR)
    rise = 1 - np.exp(-t / attack_s)

    def noise(apart):
        """Fresh noise for every snap at both ports."""
        return pair((len(s), size), apart)

    def fold(t60):
        """The fold runs for a moment and stops, leaving a weaker shiver of the whole sheet."""
        return rise * (amp(-60 * (t / t60) ** shape) + amp(after_db - 60 * t / after_t60))

    def level(x, db):
        """Set the level as if the energy of the snap filled 5 ms."""
        return unit(x) * amp(db) * np.sqrt(.005 * SR / size)

    def mode(f):
        """A facet mode: a decaying sine; the higher it is, the more its phase differs between the ports."""
        phase = 2 * np.pi * f * t + f / 3500 * rng.standard_normal((2, len(s), 1))
        return unit(band(np.sin(phase) * np.exp(-np.pi * f * t / facet_q), 360, 12000))

    facet = mode(pitch) + amp(overtone_db) * mode(pitch * rng.uniform(1.046, 2.236, s.shape))
    sheet = unit(band(noise(0.89) * fold(ring_t60), 850, 3560))
    sound = level(sheet + amp(facet_db) * facet, ring)
    # the instant of release is a hard click
    click = rise * amp(click_db - 60 * t / click_t60)
    release = noise(3.1) * (fold(crack_t60) + click)
    bright = band(release, 4500, 13900) + 0.5 * band(release, 4800, 7100, order=1)
    sound += level(bright, crack + crack_trim_db)
    sound += level(band(noise(0.39) * fold(thud_t60), 261, 947, order=3), thud)
    # the right port hears it later; each snap's own pan sets which port is louder
    side = np.array([.5, -.5])[:, None, None]
    lead = np.interp(s, *np.transpose(LEFT_LEAD)) / 1000
    delay = (.5 - side) * np.abs(lead)
    sound = irfft(rfft(sound) * np.exp(-2j * np.pi * hz * delay)) * amp(side * pan)
    out = np.zeros((2, N))
    for k, when in enumerate(s[:, 0]):
        add(out, when, sound[:, k])
    return out


# Palms and the bag bumping the table. Each row: start in seconds, level in dB before the trim.
BUMPS = [(0.744, -53.5), (0.792, -49.5), (2.019, -54), (4.161, -53), (6.61, -46), (6.702, -41),
         (9.177, -38.5), (9.279, -44.5)]


def bumps(trim_db=3.5):
    """Soft, heavy contacts push the table without making it ring: low noise that fades."""
    out, t = np.zeros((2, N)), np.arange(SR // 3) / SR
    fade = amp(-60 * t / .25)
    for s, db in BUMPS:
        push = unit(band(pair(t.shape, 0.42), 70, 150)) * fade
        add(out, s, amp(db + trim_db) * band(push, 50, 300))
    return out


# The growing pile damps the table. Each row: time in seconds, share of the ring time that is left.
PILE_DAMPING = [(7.1, 0.96), (7.4, 0.88)]
# Modes of the table top. Each row: frequency in Hz, level in dB, undamped ring time (t60) in seconds.
TABLE_MODES = [(147.1, -17, 0.71), (170, -10, 0.35), (223.6, -2.5, 0.24), (250, -5, 0.39), (285, -9, 0.44),
               (380, -19.5, 0.086), (492, 5, 0.25), (740, -4, 0.19), (804, -9.5, 0.11), (835, -2.5, 0.19),
               (1050, -32, .15), (1340, -23, .12), (1450, -22.5, 0.095)]


def table_ring(s, scatter_db, detune, contact_s=0.0013):
    """The table top struck at time s: each spot, and each snack lying on it, weights and shifts the modes."""
    t = np.arange(SR // 4) / SR
    hz, db, t60 = np.transpose(TABLE_MODES)[..., None]
    strength, shift = rng.standard_normal((2, *hz.shape))
    life = t60 * np.interp(s, *np.transpose(PILE_DAMPING)) / np.log(1000)
    tone = np.sin(2 * np.pi * hz * (1 + detune * shift) * t)
    modes = amp(db + scatter_db * strength) * np.exp(-t / life) * tone
    return modes.sum(axis=0) * (1 - np.exp(-t / contact_s))


# Snacks, or the bag holding them, landing on the table. Each row: start in seconds,
# level in dB before the trim.
DROPS = [(2.055, -21.5), (5.555, -37), (5.68, -25), (5.833, -23), (5.984, -21.5), (6.082, -32),
         (6.204, -34), (6.392, -31), (6.613, -28), (6.702, -23.5), (6.736, -22), (6.774, -24),
         (6.82, -22.5), (7.055, -27), (7.084, -29), (7.12, -34.5), (7.277, -47.5), (7.37, -27.5),
         (7.56, -31.5), (7.697, -22.5), (7.777, -29), (7.88, -42.5), (7.975, -34), (8.063, -37),
         (8.21, -29.5)]


def drops(trim_db=-7.0, knock_db=-1.5, knock_t60=0.092, rock_s=0.024, rock_db=-7.5, count=3):
    """A snack lands with a dry knock that rings the table, then rocks on its curved rim."""
    out, t = np.zeros((2, N)), np.arange(SR // 4) / SR
    for s, db in DROPS:
        contacts = np.cumsum(np.r_[0, rock_s * rng.uniform(.5, 1.5, count - 1)])
        power = 0
        for k, contact in enumerate(contacts):
            fade = amp(k * rock_db - 60 * np.abs(t - contact) / knock_t60)
            power = power + (t >= contact) * fade ** 2
        knock = band(unit(band(pair(t.shape, 0.39), 190, 960)) * np.sqrt(power), 140, 990)
        ring = table_ring(s, scatter_db=2.5, detune=0.0075)
        add(out, s, amp(db + trim_db) * (ring + amp(knock_db) * knock))
    return out


# Light rubbing of skin, sleeve and ridged snacks. Each row: middle in seconds, half length in seconds,
# pitch in Hz, level in dB.
SCRAPES = [(2.964, 0.072, 7200, -75), (3.205, 0.088, 2940, -68), (5.731, 0.086, 6700, -47.5),
           (6.876, 0.054, 6440, -48.5), (7.117, 0.065, 6300, -71), (7.68, 0.34, 6840, -56),
           (8.15, 0.12, 8000, -51)]


def scrapes(width=1.13):
    """Each light rub swells and fades as a narrow hiss."""
    out, t = np.zeros((2, N)), np.arange(SR * 3 // 5) / SR
    middle = t[-1] / 2
    for s, half, hz, db in SCRAPES:
        hiss = unit(band(pair(t.shape, 2.0), hz / width, hz * width))
        add(out, s - middle, hiss * amp(db) * np.exp(-((t - middle) / half) ** 2))
    return out


# Colour of film rubbing on the table. Each row: frequency in Hz, gain in dB.
RUB_COLOUR = [(60, -16), (140, 0), (260, 0), (400, -7.5), (650, -8.5), (900, -6.5), (1400, -4.5),
              (1900, -3.5), (2400, 0.5), (3000, -9), (3600, -4), (4200, -5), (7000, -10), (13000, -11),
              (15500, -19)]
# The bag sliding under the hand. Each row: time in seconds, level in dB before the trim.
SLIDE = [(3.07, -78), (3.282, -65), (3.292, -47), (3.36, -51), (3.44, -45.5), (3.53, -43.5), (3.65, -47),
         (3.84, -51)]


def slide(trim_db=-1.0, drag_db=1.0, drag_hz=25):
    """Film rubbing over the table: dense, tiny slips at an uneven pace, coloured by the bending sheet."""
    s, db = np.transpose(SLIDE)
    rub = amp(np.interp(np.arange(N) / SR, s, db, left=-120, right=-120))
    knots = np.arange(N) * drag_hz / SR
    drag = amp(drag_db * map_coordinates(rng.standard_normal(SR // 50), [knots]))
    slips = coloured(patchy(ticks(8700, 1.7, 1.6), 1.2, 3, 30), RUB_COLOUR)
    return amp(trim_db) * rub * drag * slips


NUDGES_PER_S, NUDGE_SPREAD_DB = 30, 3


def pile(stir, nudge_db=-3.0, count=100):
    """While they pour, snacks of the pile tip against the table in small, uneven knocks."""
    out, push = np.zeros((2, N)), stir * pouring()
    times = POUR[0][0] + (np.arange(count) + rng.random(count)) / NUDGES_PER_S
    for s, db in zip(times, NUDGE_SPREAD_DB * rng.standard_normal(count)):
        strength = amp(nudge_db + db) * push[min(round(s * SR), N - 1)]
        add(out, s, strength * table_ring(s, scatter_db=3.5, detune=.05)[None])
    return out


# Decay of the small bare room. Each row: frequency in Hz, t60 in seconds.
ROOM_DECAY = [(150, 0.5), (400, 0.28), (1000, 0.45), (3000, 0.47), (7000, 0.28), (15000, 0.27)]


def room_tail(gap_s=.005, alike_hz=1300):
    """A diffuse tail after a short gap: noise whose bands die away at their own rates."""
    hz, t, z = signal.stft(rng.standard_normal((3, SR * 2 // 3)), SR, nperseg=256)
    # long waves reach both ports alike
    alike = 1 / (1 + (hz[:, None] / alike_hz) ** 2)
    z = np.sqrt(alike) * z[0] + np.sqrt(1 - alike) * z[1:]
    decay = amp(-60 * t / along(ROOM_DECAY, hz)[:, None])
    tail = signal.istft(z * decay, SR, nperseg=256)[1]
    return np.pad(tail / np.linalg.norm(tail[0]), ((0, 0), (round(gap_s * SR), 0)))


# Strength of the room's answer at the microphone. Each row: frequency in Hz, gain in dB.
ROOM_LEVEL = [(100, -9), (400, -6.5), (500, -7), (630, -4.5), (850, -14.5), (1400, -12), (3000, -12),
              (8000, -10.5), (15000, -10.5)]


def room(x, count=3):
    """The room answers with a diffuse wash: slices of 50 ms feed a few different tails in turn."""
    turn = np.arange(N) // (SR // 20) % count
    wet = 0
    for k in range(count):
        wet = wet + signal.oaconvolve(x * (turn == k), room_tail(), axes=1)[:, :N]
    return filtered(wet, lambda hz: amp(along(ROOM_LEVEL, hz)))


def scene():
    """Bag, snacks and table close to the microphone in the quiet room."""
    film, stir = handling()
    bag = crackle(film) + crisp_ticks(film) + jostle(stir) + snaps(SNAPS + small_snaps(film))
    landing = band(drops() + pile(stir), 120, 5000)
    near = bag + bumps() + landing + scrapes() + slide()
    return near + room(near) + room_hush()


TOP_HZ = 16300  # band limit of the recorder
# Colour of the microphone. Each row: frequency in Hz, gain in dB.
MIC_COLOUR = [(20, -10), (50, -4), (110, -4.5), (450, -4.5), (610, -8.5), (800, -0.5), (1100, -1.5),
              (1450, -1), (2200, -2), (3400, 0), (5500, -2), (7700, -0.5), (9500, -5.5), (12500, -4),
              (15000, -10), (16000, -18)]


def record(dry):
    """The microphone colours the sound; the recorder clips at full scale and has a band limit."""
    heard = filtered(dry, lambda hz: amp(along(MIC_COLOUR, hz)))
    return filtered(np.clip(heard, -1, 1), lambda hz: hz < TOP_HZ)


dry = scene()
out = record(dry)
store_pcm(out)
```